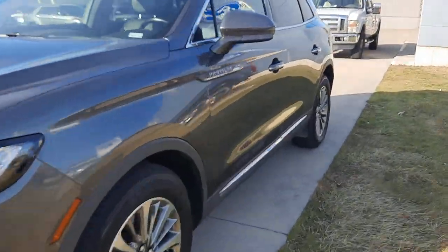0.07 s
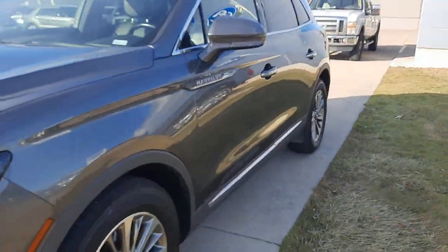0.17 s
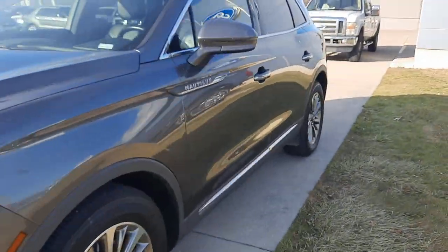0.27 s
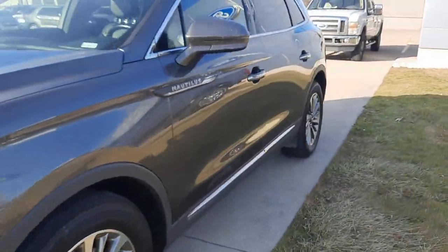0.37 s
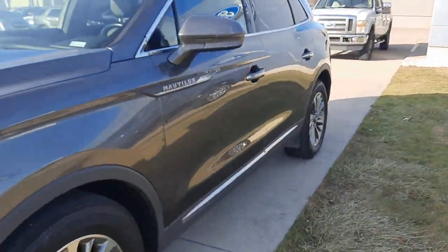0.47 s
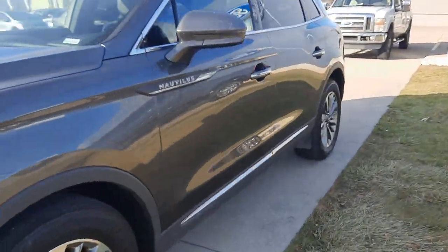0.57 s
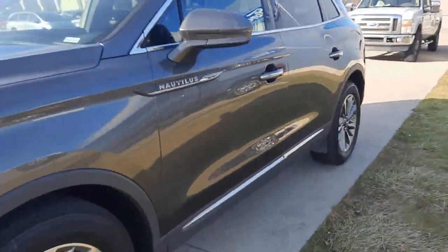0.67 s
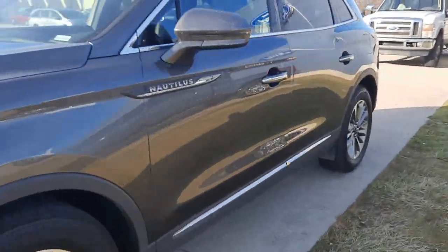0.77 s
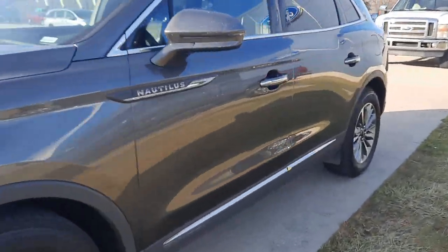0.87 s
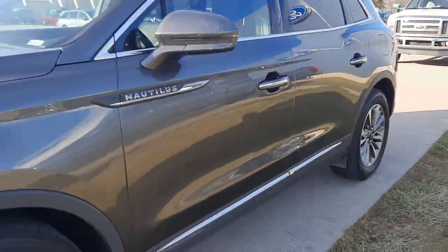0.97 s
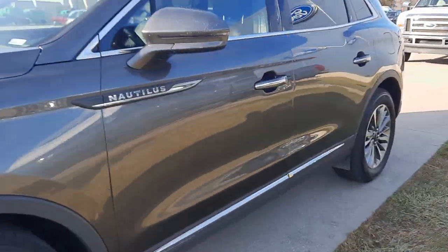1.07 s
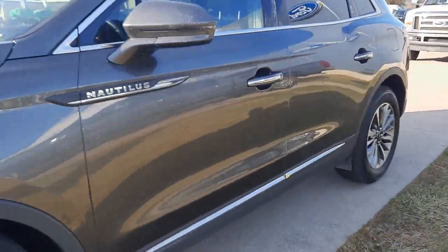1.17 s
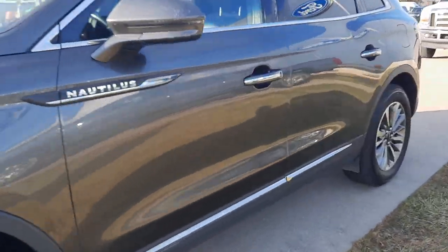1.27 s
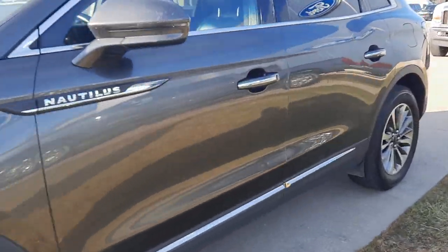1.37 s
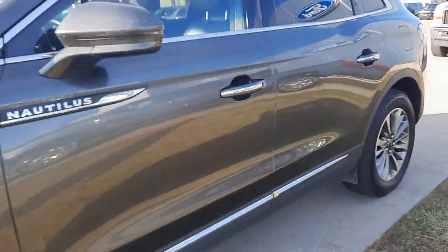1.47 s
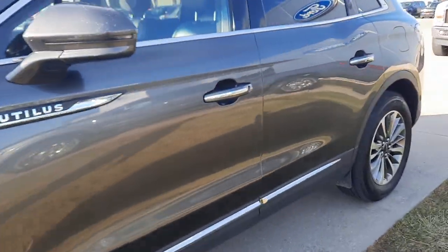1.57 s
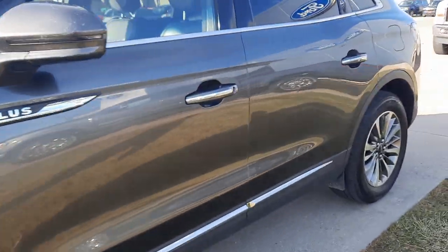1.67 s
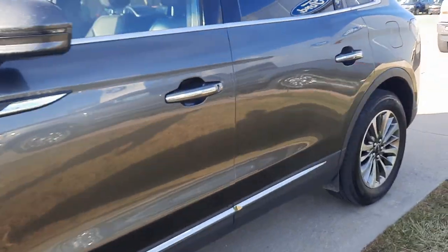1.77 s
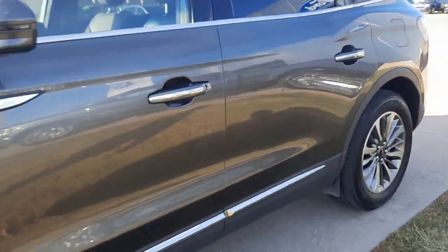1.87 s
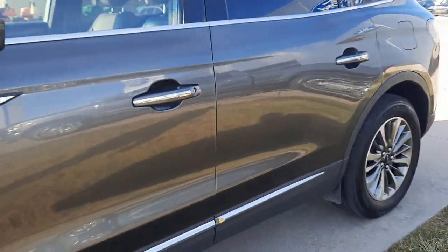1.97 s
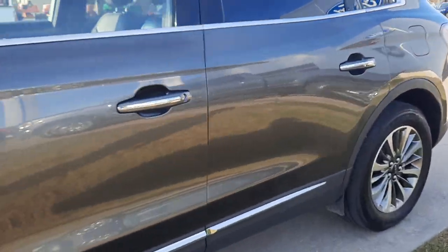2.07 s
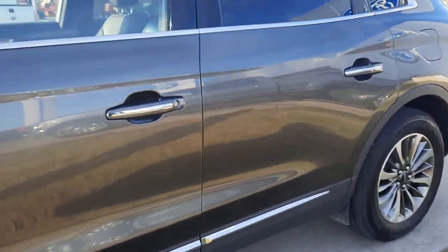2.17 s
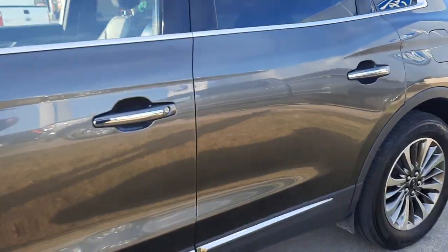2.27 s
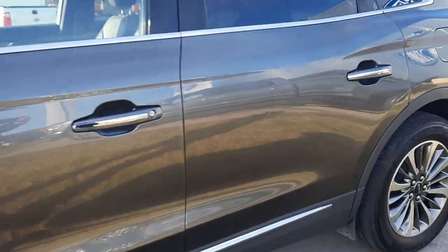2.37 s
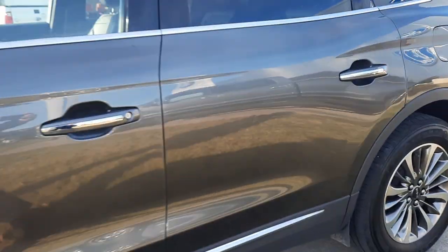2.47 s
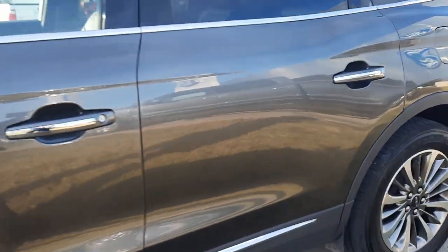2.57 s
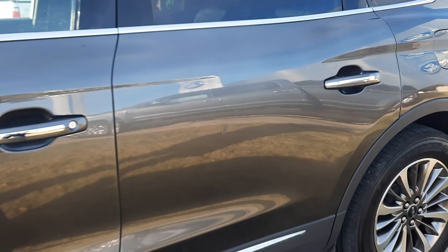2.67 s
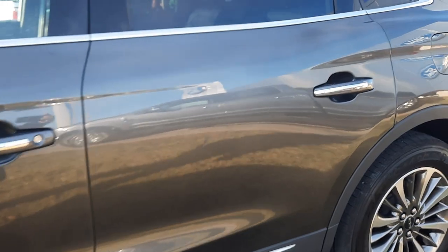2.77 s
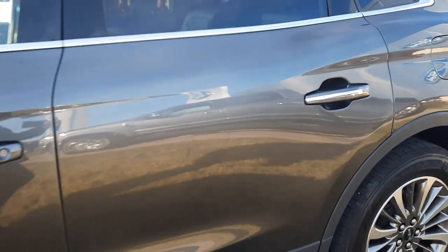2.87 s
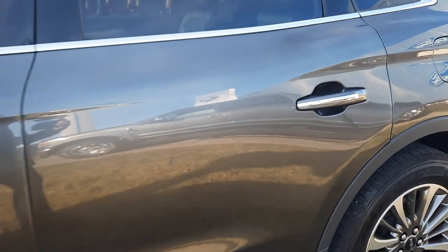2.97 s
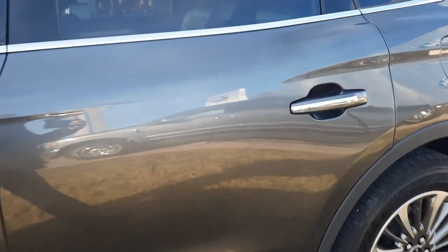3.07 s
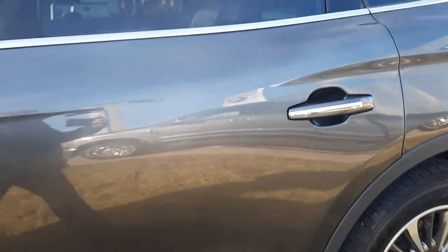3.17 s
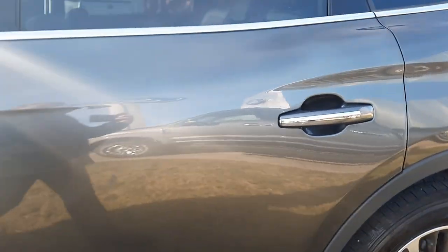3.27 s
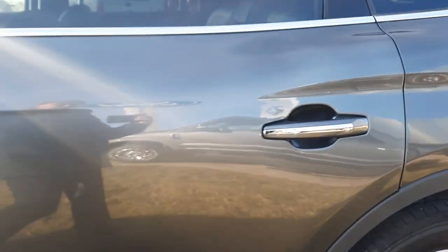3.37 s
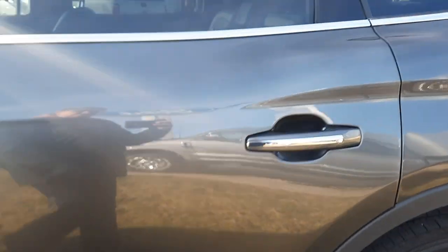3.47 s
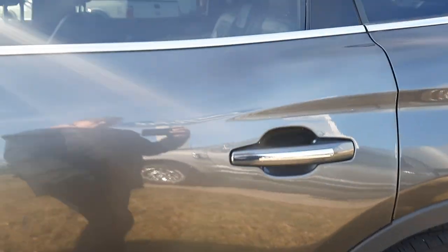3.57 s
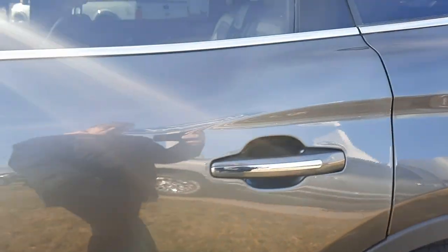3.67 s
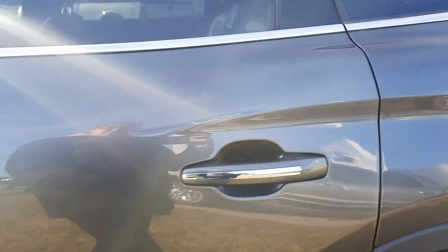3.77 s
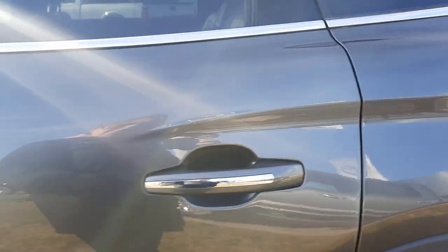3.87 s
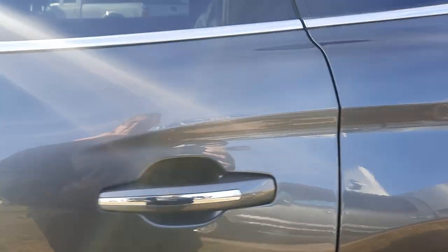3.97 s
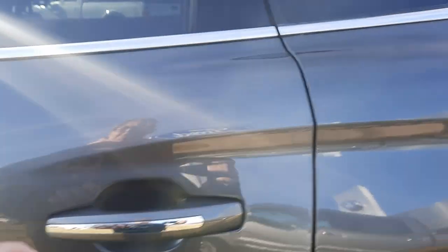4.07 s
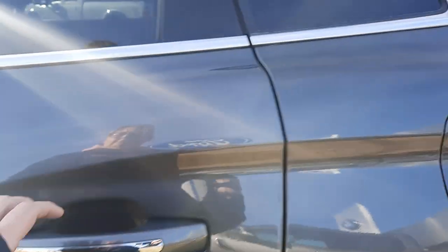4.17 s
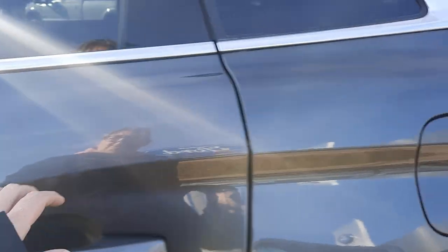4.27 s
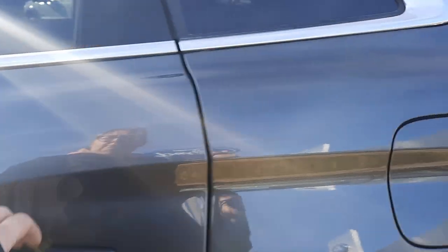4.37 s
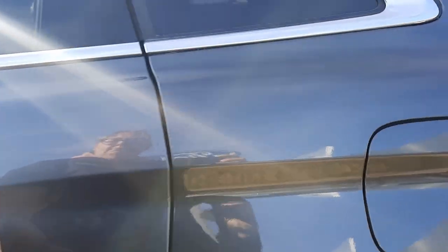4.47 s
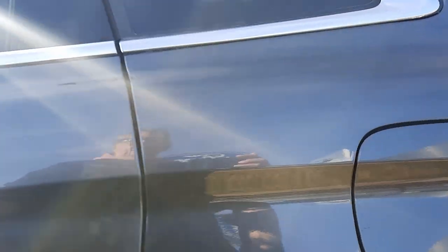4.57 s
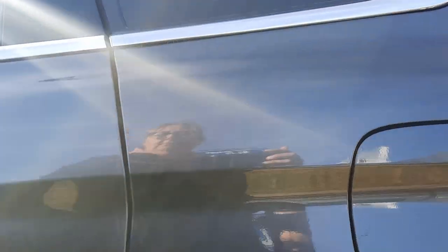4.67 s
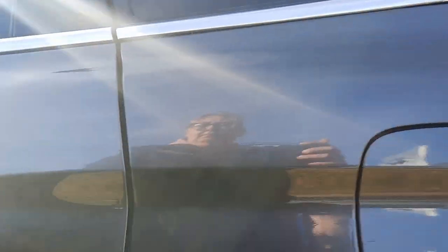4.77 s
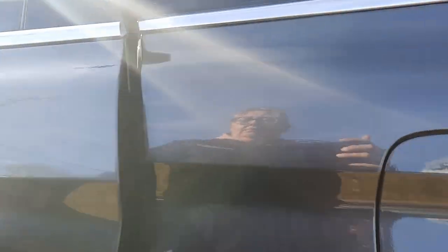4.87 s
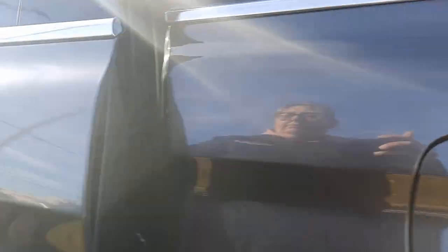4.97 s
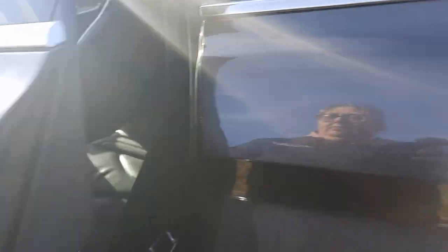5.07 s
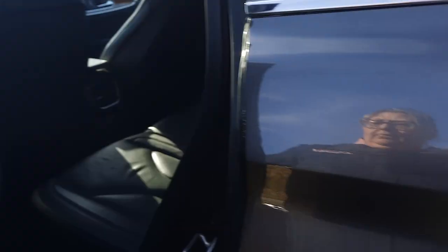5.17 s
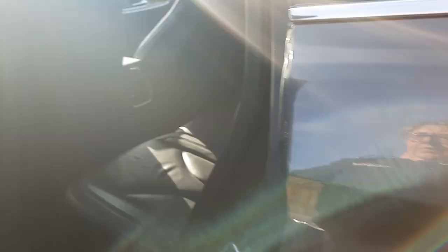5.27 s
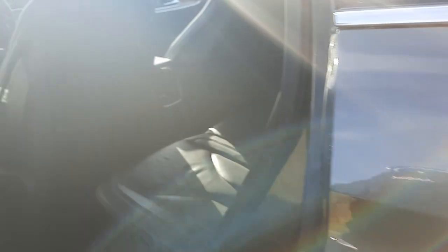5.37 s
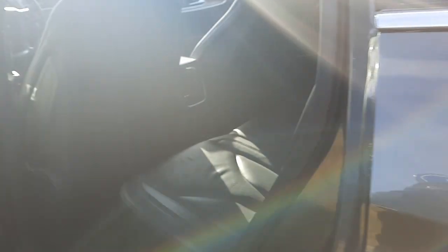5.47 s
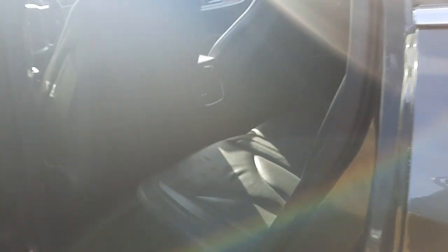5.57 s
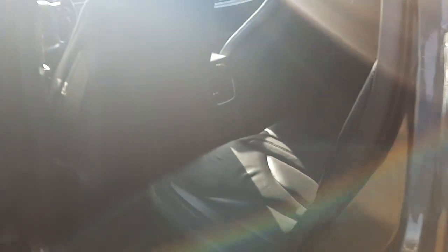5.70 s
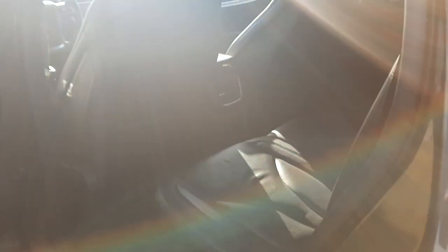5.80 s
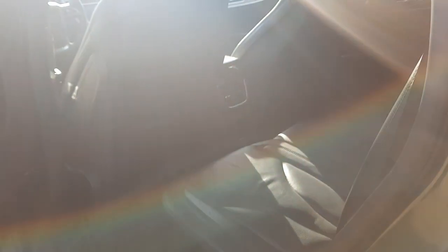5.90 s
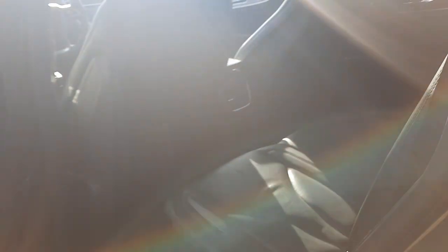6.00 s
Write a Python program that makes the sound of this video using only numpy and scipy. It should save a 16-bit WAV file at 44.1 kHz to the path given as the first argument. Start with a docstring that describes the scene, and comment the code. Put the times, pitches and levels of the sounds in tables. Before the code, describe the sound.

Outdoors beside a parked car, cloth rustles and small ticks lead to a dull latch clunk, then a loud sharp crack of the handle snapping back.

```python
"""Opening a car door

Someone walks along a parked car with a camera, sleeve rustling, and opens the rear door.
The latch lets go with a dull clunk, then the released handle snaps back against the panel.
Knocks, ticks and squeaks are dying noise and sine waves; rustle, rumble and traffic are shaped noise.
A far bird is a row of noise chirps; a faint machine hum is two sine waves that swell and fade slowly together."""
import sys
import numpy as np
from scipy import signal
from scipy.fft import rfft, irfft, next_fast_len
from scipy.io import wavfile
from scipy.ndimage import uniform_filter1d, map_coordinates

SR = 44100
rng = np.random.default_rng(int(sys.argv[2]) if len(sys.argv) > 2 else 0)


def generate_wav(sig):
    """Save sig (samples, or channels by samples) to the path in sys.argv[1] as 16-bit PCM at SR."""
    pcm = np.round(np.clip(np.atleast_2d(sig).T, -1, 1) * 32767).astype(np.int16)
    wavfile.write(sys.argv[1], SR, pcm)


N = 266187  # samples in the scene
T = np.arange(SR // 2) / SR  # half a second of time for each short sound [s]


def amp(db):
    """Turn decibels into a gain."""
    return 10 ** (np.asarray(db) / 20)


def unit(x):
    """Scale to an rms (average strength) of 1."""
    return x / np.sqrt(np.mean(x ** 2) + 1e-20)


def along(points, hz):
    """Read (frequency [Hz], value) points at any frequency, on a log axis."""
    f, v = np.transpose(points)
    return np.interp(np.log(hz + 1), np.log(f + 1), v)


def level_curve(points):
    """Join (time [s], level [dB]) points into one level per sample."""
    s, db = np.transpose(points)
    return np.interp(np.arange(N) / SR, s, db)


def wobble(rate):
    """A smooth random curve through `rate` random points a second."""
    knots = rng.standard_normal(int(N * rate / SR) + 4)
    return map_coordinates(knots, [np.arange(N) * rate / SR])


def filtered(x, response):
    """Multiply the spectrum of x by a response that depends on frequency."""
    n = x.shape[-1]
    m = next_fast_len(n + 8192)
    return irfft(rfft(x, m) * response(np.fft.rfftfreq(m, 1 / SR)), m)[..., :n]


def add(track, s, sound):
    """Mix a sound into a track from time s [s] on."""
    part = track[..., round(s * SR):][..., :sound.shape[-1]]
    part += sound[..., :part.shape[-1]]


def rush(spectrum, patchy_db):
    """Stereo noise of rms 1 from all around, with random louder and softer patches in time and pitch."""
    # how alike left and right are: (frequency [Hz], likeness [-1 to 1])
    alike = [(60, 0.51), (130, 0.62), (300, 0.54), (640, 0.5), (950, -0.16), (1350, -0.62), (2300, 0.35),
             (3200, -0.17), (15000, 0.075)]
    z = signal.stft(rng.standard_normal((2, N)), nperseg=512)[2]
    grain = rng.standard_normal(z.shape[1:])
    patches = unit(uniform_filter1d(uniform_filter1d(grain, 8, 0), 12, 1))
    pair = signal.istft(z * amp(patchy_db * patches), nperseg=512)[1][:, :N]

    def colour(hz):
        # more of the second noise (the side) makes left and right less alike
        turn = np.arccos(np.clip(along(alike, hz), -1, 1)) / 2
        return amp(along(spectrum, hz)) * [np.cos(turn), np.sin(turn)]

    mid, side = filtered(pair, colour)
    return unit(np.array([mid + side, mid - side]))


def dense(spectrum, spread):
    """Many close resonances heard as coloured noise; spread sets how much left and right differ."""
    noise = rng.standard_normal((2, len(T)))
    mid, side = filtered(noise, lambda hz: amp(along(spectrum, hz)))
    return unit(np.array([mid + spread * side, mid - spread * side]))


def burst(spectrum, t60, rise, spread):
    """A contact sets dense resonances going; they build up over rise [s] and fall 60 dB in t60 [s]."""
    return dense(spectrum, spread) * amp(-60 * T / t60) * (1 - np.exp(-T / rise))


def snap(hz, cycles):
    """A tiny contact: a sine wave that falls 60 dB within the given cycles."""
    return np.sqrt(2) * np.sin(2 * np.pi * hz * T) * amp(-60 * T * hz / cycles)


def thuds(rows):
    """Heavily damped pushes: a few low cycles that swell to a crest and fade."""
    out = np.zeros(N)
    t = np.arange(-SR // 10, SR // 10) / SR  # time from the crest
    for s, db, hz, half in rows:
        swell = 1 / np.cosh(np.pi / 2 * t / half)
        add(out, s + t[0], amp(db) * np.cos(2 * np.pi * hz * t) * swell)
    return out * np.sqrt(2)


def outdoors(rumble_db=6.0, traffic_db=1, hiss_db=-56, right_db=2.0):
    """Lumpy low rumble, stronger on the right, far traffic and a steady hiss, all of shaped noise."""
    # colours of the three noises: (frequency [Hz], relative level [dB per Hz])
    rumble_colour = [(20, -27), (33, -17), (55, 0), (80, 3), (120, -2.5), (170, -2.5), (240, -10),
                     (320, -3), (450, -16), (800, -43.5)]
    traffic_colour = [(150, -29), (330, 4), (420, 3), (520, 1.5), (700, -2), (1000, -4.5), (1400, -6),
                      (2000, -10.5), (3200, -18.5), (6000, -19), (16000, -40.5)]
    hiss_colour = [(1760, -33), (3000, -9.5), (3830, 1), (5530, -9.5), (5930, -3.5), (7720, -2),
                   (8940, -16), (12000, 2), (15800, -4)]
    # level of the low rumble before rumble_db is added: (time [s], level [dB])
    rumble_level = [(0.0, -52), (1.14, -45), (2.47, -45.5), (2.87, -42.5), (4.1, -47), (4.87, -42.5),
                    (5.03, -42.5), (5.45, -39.5), (6.04, -45.5)]
    # far traffic fades as the walk leads along the car; before traffic_db: (time [s], level [dB])
    traffic_level = [(0.0, -42.5), (0.28, -44), (0.89, -41.5), (1.48, -44.5), (4.03, -48.5), (4.18, -46),
                     (5.63, -50), (6.04, -48.5)]
    lumps_db = 2.63 * wobble(18)
    rumble = amp(level_curve(rumble_level) + rumble_db + lumps_db) * rush(rumble_colour, patchy_db=0.5)
    rumble = rumble * amp([[-right_db], [right_db]])
    traffic = amp(level_curve(traffic_level) + traffic_db) * rush(traffic_colour, patchy_db=1.5)
    hiss = amp(hiss_db) * rush(hiss_colour, patchy_db=1.9)
    return rumble + traffic + hiss


def hum(drift=0.00793, waver_db=3.5):
    """A far machine hums: two sine waves swell and fade slowly together and drift a little in pitch."""
    # tones of the hum: (frequency before drift [Hz], relative level before waver [dB])
    hum_lines = [(199.3, -2.5), (398.6, -14)]
    middle_db, swell_depth_db, swell_s, swell_crest_s = -49, 6.5, 1.222, 0.91
    swell = np.cos(2 * np.pi * (np.arange(N) / SR - swell_crest_s) / swell_s)
    clock = np.cumsum(1 + drift * wobble(7)) / SR  # time that runs a little fast or slow bends the pitch
    lines = sum(amp(db + waver_db * wobble(11)) * np.sin(2 * np.pi * hz * clock) for hz, db in hum_lines)
    return amp(middle_db + swell_depth_db * swell) * np.sqrt(2) * lines


def sleeve(flutter_db=3.1):
    """Cloth rubs near the microphone: noise that swells and fades with each swish and flutters quickly."""
    # colour of rubbing cloth: (frequency [Hz], relative level [dB per Hz])
    rustle = [(500, -31), (1500, 2.5), (3500, 0), (5000, -1.5), (6500, 0.5), (7700, -1), (8800, -12.5),
              (10500, -18), (12300, 3.5), (13500, 5.5), (14600, 4.5), (15800, -8.5)]
    # swishes, before flutter: (time of crest [s], level at crest [dB], half length [s])
    swishes = [(0.07, -57.5, 0.13), (0.39, -50.5, 0.053), (0.713, -47, 0.089), (0.927, -54, 0.04),
               (1.21, -50, .08), (1.385, -44, 0.053), (1.507, -47.5, 0.061), (2.042, -50, 0.071),
               (2.574, -50.5, 0.14), (2.75, -47.5, 0.095), (3.03, -49.5, 0.12), (3.322, -46, 0.064),
               (3.57, -53, 0.15), (4.047, -53, 0.072), (4.35, -53.5, 0.093), (4.802, -46.5, 0.073),
               (5.15, -48.5, 0.14), (6.01, -48, 0.065)]
    t = np.arange(N) / SR
    power = sum(amp(db) ** 2 * np.exp(-((t - s) / half) ** 2) for s, db, half in swishes)
    return np.sqrt(power) * amp(flutter_db * wobble(45)) * rush(rustle, patchy_db=1.0)


def low_bumps(right_db=4.5):
    """Footfalls, hand bumps and late pushes of the door skin: low thuds, stronger on the right."""
    # (time of crest [s], level before the left-right tilt [dB], frequency [Hz], half length [s])
    bumps = [(0.143, -28, 145, 0.0024), (1.735, -31.5, 165, 0.0055), (2.275, -32, 81, 0.007),
             (2.704, -21.5, 112, 0.0035), (2.84, -32, 74.4, 0.0055), (4.745, -40, 91, 0.028),
             (5.318, -23.5, 113, 0.0037), (5.378, -30.5, 112, 0.036), (5.7635, -25, 290, 0.0023),
             (5.775, -26, 82.3, 0.0073)]
    return thuds(bumps) * amp([[-right_db], [right_db]])


def small_sounds(scatter_db=2, pitch_scatter=0.14, count=5):
    """Ticks and two brief shoe squeaks, each a ringing snap with grit, fainter random ticks, and shoe scuffs."""
    # colours of the grit and of shoes scuffing on concrete: (frequency [Hz], relative level [dB per Hz])
    grit_colour = [(100, -23), (400, 13.5), (900, 11.5), (2200, -2.5), (3200, -6.5), (7000, -6),
                   (9500, -21), (14000, -18)]
    scuff_colour = [(2000, 0.5), (4500, -16), (6000, 7), (9000, -16), (13200, 2), (16000, 0.5)]
    # ticks and squeaks: (time [s], snap level [dB], snap frequency [Hz], length of the snap [cycles],
    # grit level [dB], time for the grit to fall 60 dB [s])
    ticks = [(0.739, -12, 1190, 1.3, -33.5, 0.075), (2.4905, -32.5, 5630, 78, -48, 0.031),
             (2.87, -32, 6500, 14, -33, 0.023), (2.994, -15.5, 1550, 2.4, -42, 0.027),
             (4.214, -28.5, 1400, 4.6, -41, 0.017), (4.303, -28, 1400, 2.2, -45, .015),
             (5.2465, -28, 2400, 4, -32.5, 0.084), (5.4095, -26.5, 2200, 5, -33, 0.04),
             (5.743, -26.5, 1730, 5.6, -56, 0.016)]
    # shoe scuffs: (time [s], level [dB], time to fall 60 dB [s])
    scuffs = [(2.486, -41.5, 0.27), (2.53, -35, 0.064), (2.869, -37, 0.25), (4.488, -41.5, .15)]
    out = np.zeros((2, N))
    for s, snap_db, hz, cycles, grit_db, t60 in ticks:
        grit = burst(grit_colour, t60, rise=0.00025, spread=0.55)
        add(out, s, amp(snap_db) * snap(hz, cycles) + amp(grit_db) * grit)
    # fainter ticks, without grit, while the hand reaches for the handle
    from_s, to_s, middle_db, middle_hz, reach_cycles = 3.93, 4.29, -32, 1450, 2.2
    for s in rng.uniform(from_s, to_s, count):
        size, pitch = rng.standard_normal(2)
        hz = middle_hz * np.exp(pitch_scatter * pitch)
        add(out, s, amp(middle_db + scatter_db * size) * snap(hz, reach_cycles))
    for s, db, t60 in scuffs:
        add(out, s, amp(db) * burst(scuff_colour, t60, rise=0.0012, spread=1.0))
    return out


def bird(width_hz=420, half=0.013, scatter_hz=110, count=8):
    """A far trill of evenly spaced chirps, blurred into narrow noise by distance and echoes."""
    # the two bands of every chirp: (middle frequency before scatter [Hz], level [dB])
    chirp_voices = [(2650, -55.5), (4350, -55)]
    first_s, gap_s = 2.233, 0.047  # crest of the first chirp, then time from one to the next
    out = np.zeros((2, N))
    t = np.arange(-SR // 20, SR // 20) / SR  # time from the crest
    for k, shift in enumerate(scatter_hz * rng.standard_normal(count)):
        for pitch, db in chirp_voices:
            noise = rng.standard_normal((2, len(t)))
            blur = filtered(noise, lambda hz: np.exp(-((hz - pitch - shift) / width_hz) ** 2))
            add(out, first_s + k * gap_s + t[0], amp(db) * unit(blur) * np.exp(-(t / half) ** 2))
    return out


def panel(soft_hz):
    """The door rings as a sum of dying sine waves; a soft contact hardly stirs the high ones."""
    # door panel and handle resonances: (frequency [Hz], relative level before softening and scatter [dB],
    # time to fall 60 dB [s], build-up time [s])
    door = [(94.7, -23.5, 0.39, 0.01), (187, -16, 0.15, 0.011), (252, -19, 0.17, 0.014),
            (303.6, 0.5, 0.18, 0.11), (351, -15, 0.12, 0.0096), (490, -17, 0.16, 0.0015),
            (643, -34, 0.35, .002), (675, -18.5, 0.12, 0.0067), (781, -21.5, 0.091, 0.00097),
            (888, -36, 0.17, .001), (1006, -20, 0.1, 0.00088), (1370, -15.5, 0.057, 0.00078),
            (1850, -23, 0.063, .0005), (2007, -18, 0.094, 0.00039), (2230, -32, 0.14, 0.00046),
            (2300, -31, 0.1, .0005), (3450, -10, 0.035, 0.00045), (5450, -22, 0.064, .0005)]
    out = np.zeros(len(T))
    for hz, db, t60, rise in door:
        fade = amp(db + rng.normal(0, 1) - 60 * T / t60)
        softening = 1 / (1 + (hz / soft_hz) ** 2)
        out += fade * (1 - np.exp(-T / rise)) * np.sin(2 * np.pi * hz * T) * softening
    return out


def latch(ring_db=-10, soft_hz=700, count=5):
    """The pawl drags, slips off the striker and rattles in the hollow door, each rebound weaker."""
    # colours of the steel parts and the hollow door: (frequency [Hz], relative level [dB per Hz])
    steel_colour = [(300, -6), (900, 13.5), (1400, -9), (2000, -2), (2600, 3.5), (3800, -11.5),
                    (5000, -9.5), (6800, -2.5), (9000, -24), (13500, -15), (16000, -16)]
    cavity_colour = [(60, -7), (130, -9), (220, 7.5), (310, 4.5), (430, 2.5), (520, -0.5), (620, -3),
                     (720, -23), (850, -6.5), (1050, -14), (1300, -20), (3000, -47)]
    # contacts, in turn: two ticks of the dragging pawl, the take-up, the slip, the release,
    # the pawl falling back, the door leaving its seal:
    # (time [s], steel level [dB], hollow knock level [dB], time for the hollow rattle to fall 60 dB [s])
    contacts = [(4.7377, -35.5, -42, .02), (4.7962, -28.5, -39, .02), (4.807, -44, -22, 0.094),
                (4.8355, -27.5, -19, 0.024), (4.8399, -18, -10.5, 0.055), (4.8488, -24.5, -24, 0.23),
                (4.886, -50, -20, 0.17)]
    rebound_s, steel_loss_db = 0.0086, 8  # time and steel loss from one rebound to the next
    out = np.zeros((2, N))
    for s, steel_db, knock_db, rattle_t60 in contacts:
        for k in range(count):
            delay = k * rebound_s
            steel = burst(steel_colour, t60=0.034, rise=0.00045, spread=0.75)
            knock = burst(cavity_colour, t60=0.075, rise=0.00063, spread=0.23)
            steel_gain = amp(steel_db - k * steel_loss_db)
            knock_gain = amp(knock_db - 60 * delay / rattle_t60)
            add(out, s + delay, steel_gain * steel + knock_gain * knock)
    release = max(contacts, key=lambda row: row[2])[0]  # the loudest hollow knock
    add(out, release, amp(ring_db) * panel(soft_hz))
    return out


def door_flex():
    """The door skin is pushed softly at the latch's release and after the handle's snap: low thuds."""
    # (time of crest [s], level [dB], frequency [Hz], half length [s])
    flex = [(4.8425, -12.5, 300, 0.0098), (4.846, -31, 112, 0.04), (5.5635, -14.5, 123, 0.0054)]
    return thuds(flex)


def handle(s=5.5481, crack_db=0.0, clatter_db=-15, ring_db=-1):
    """The spring throws the handle against its stop: a crack, clattering linkage and ringing panel."""
    # colour of the crack and clatter: (frequency [Hz], relative level [dB per Hz])
    snap_colour = [(150, -13), (450, -1.5), (780, -2), (1150, -10), (1340, -2), (1550, -4.5), (2000, -2.5),
                   (2500, -8.5), (3100, -12), (3650, -9.5), (5000, -15.5), (6300, -8.5), (9500, -33),
                   (13500, -19)]
    # how long the clatter lasts at each pitch: (frequency [Hz], time to fall 60 dB [s])
    snap_decay = [(400, 0.3), (900, 0.15), (2100, .11), (3500, 0.1), (6500, 0.073), (13000, 0.068)]
    hz, t, z = signal.stft(dense(snap_colour, spread=0.71), SR, nperseg=128)
    fading = z * amp(-60 * t / along(snap_decay, hz)[:, None])
    clatter = signal.istft(fading, SR, nperseg=128)[1][:, :len(T)]
    clatter = clatter * (1 - np.exp(-T / 0.0011))
    crack = burst(snap_colour, t60=0.013, rise=0.001, spread=0.75)
    ring = panel(soft_hz=12000)  # a hard contact stirs the high resonances too
    out = np.zeros((2, N))
    add(out, s, amp(crack_db) * crack + amp(clatter_db) * clatter + amp(ring_db) * ring)
    return out


def scene(left_db=0.9):
    """The car and small sounds reach the right port later and weaker than the left; all layers are mixed."""
    # how much later the right port hears the car and small sounds: (frequency [Hz], delay [s])
    lag = [(300, 0.00022), (800, 0.0002), (1150, 0.00046), (1800, 0.00048), (3000, 0.0005),
           (15000, 0.000508)]
    left, right = small_sounds() + latch() + door_flex() + handle()
    right = filtered(right, lambda hz: np.exp(-2j * np.pi * hz * along(lag, hz)))  # delay each frequency
    near = np.array([left * amp(left_db), right * amp(-left_db)])
    return outdoors() + hum() + sleeve() + low_bumps() + bird() + near


def record(dry):
    """Each port has its own colour; the camera rounds off the highest peaks and cuts the very top pitches."""
    # colour of the ports: (frequency [Hz], boost on the left and equal cut on the right [dB])
    ports = [(300, 1), (600, 1.34), (1500, 0), (4000, 0), (6300, -1), (9500, 4), (13000, 0)]
    top_hz = 15850
    heard = filtered(dry, lambda hz: amp(np.outer([1, -1], along(ports, hz))))
    rounded = heard / (1 + np.abs(heard / .95) ** 6) ** (1 / 6)
    return filtered(rounded, lambda hz: hz < top_hz)


dry = scene()
out = record(dry)
generate_wav(out)
```